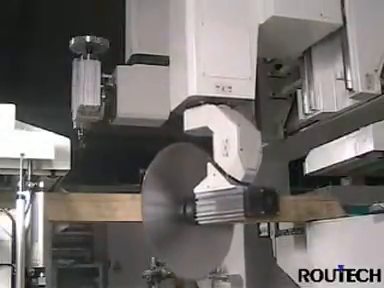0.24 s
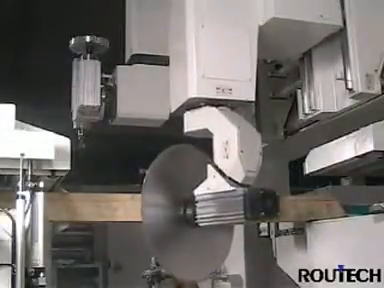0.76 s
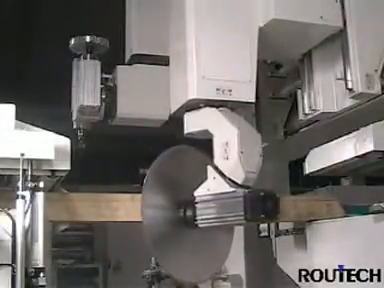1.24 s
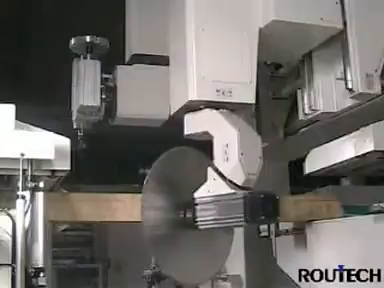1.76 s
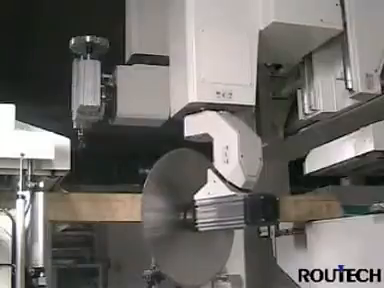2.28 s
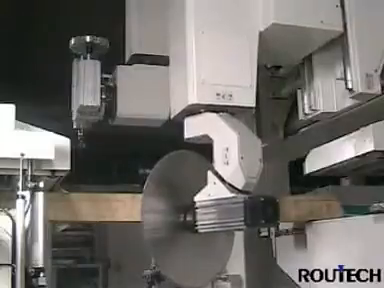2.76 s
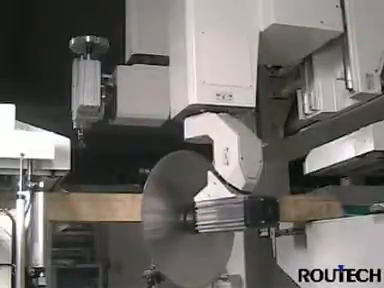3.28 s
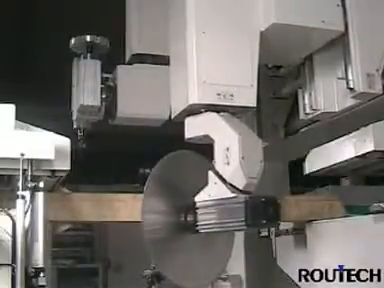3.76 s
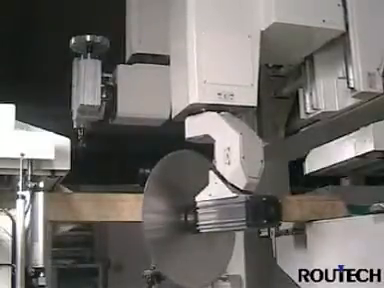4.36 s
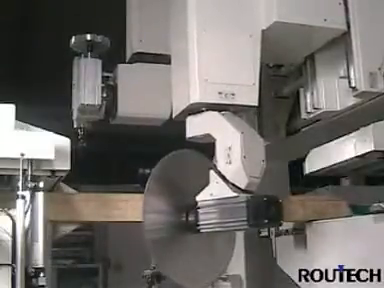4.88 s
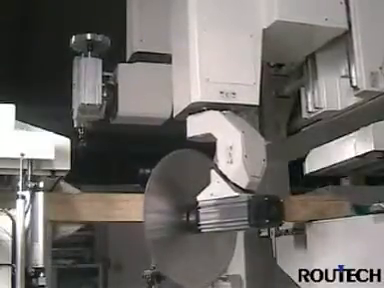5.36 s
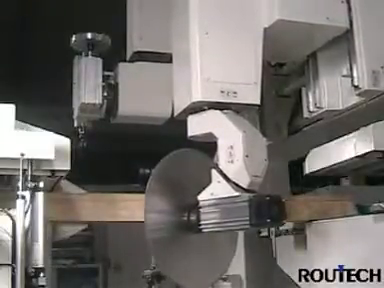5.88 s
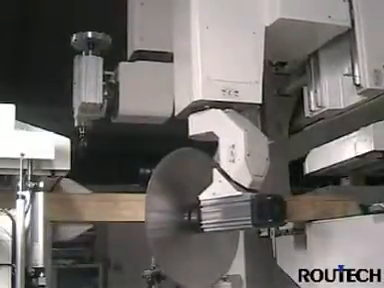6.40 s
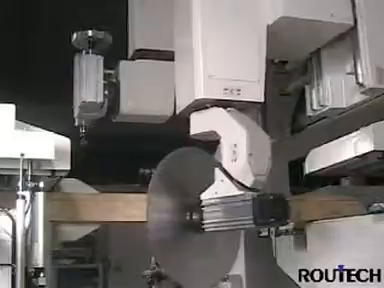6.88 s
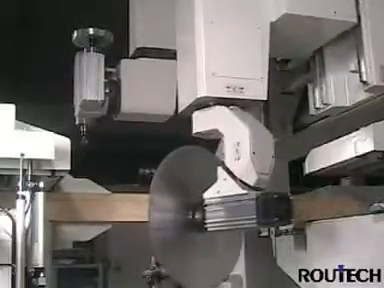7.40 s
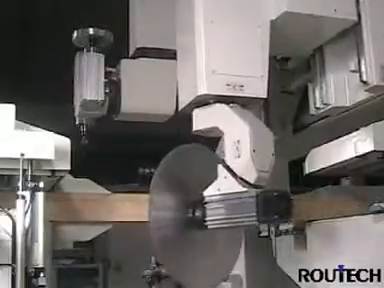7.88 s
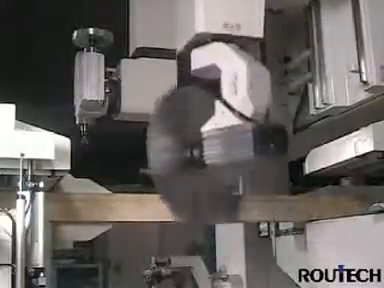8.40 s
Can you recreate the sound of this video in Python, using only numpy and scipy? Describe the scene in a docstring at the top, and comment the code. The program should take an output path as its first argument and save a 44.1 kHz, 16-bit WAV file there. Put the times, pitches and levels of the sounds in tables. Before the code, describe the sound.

In a workshop, a big spinning saw blade whooshes steadily while its teeth buzz and whine in a wooden beam. Midway it bites harder: the wood growls briefly, the ringing grows stronger and splinters spit off in little bursts. For the last couple of seconds the cutting is over and only the rushing blade remains, with a soft motor hum and low room rumble underneath.

```python
"""A broad whoosh with a buzzing whine: a large 48-tooth saw blade is cutting through a wooden beam.
The spinning teeth whip up the air and whine as they strike the wood. Being uneven, they repeat a buzzing
pattern on every turn. Near 4 s the cut gets heavier, the beam growls and splinters fly. Near 6.4 s the
blade comes out and whooshes on in free air. Motors hum and the workshop rumbles underneath."""
import sys
import numpy as np
from scipy import signal
from scipy.fft import rfft, irfft, next_fast_len
from scipy.io import wavfile
from scipy.ndimage import map_coordinates

SR = 44100
rng = np.random.default_rng(int(sys.argv[2]) if len(sys.argv) > 2 else 0)


def persist_wave(psi):
    """Save psi, clipped to +-1, as 16-bit WAV."""
    counts = np.round(np.clip(psi, -1, 1) * 32767).astype(np.int16)
    wavfile.write(sys.argv[1], SR, np.atleast_2d(counts).T)


N = 381465
TIME = np.arange(N) / SR
TEETH = 48
HEAVY_FROM_S, HEAVY_RISE_S = 3.82, .12   # the light cut turns heavy
EXIT_S, EXIT_FADE_S = 6.38, .07   # the blade leaves the beam

# Blade speed, sagging under load: time_s, turns_per_s
BLADE_SPEED = [(0, 24.885), (1.5, 24.915), (3.4, 24.921), (4.05, 24.864), (5.7, 24.866), (6.6, 24.9)]
# Air whipped by the teeth: time_s, level_db
WHOOSH_LEVEL = [(0, -20.5), (3.5, -19.5), (4.1, -23.5), (4.6, -21), (5.0, -21.5), (5.6, -21), (6.0, -20),
                (6.5, -19), (7.5, -18.5), (8, -19), (8.65, -18.6)]
# The whoosh's mix of low and high sound: pitch_hz, relative_db
WHOOSH_COLOUR = [(290, -54.5), (500, -30), (559, -30.5), (610, -29.5), (633, -24), (699, -25), (811, -16.5),
                 (1180, -9.5), (1380, -2.5), (1600, -3.5), (1860, -8.5), (2840, -21), (3920, -24),
                 (6050, -35), (9700, -40), (12600, -70.5), (21300, -120)]
# Teeth scraping the wood: time_s, level_db, treble_boost_db
BUZZ_LEVEL = [(0, -33, 5), (.5, -33, 2.5), (1, -31, 1), (1.5, -32.5, 1.5), (2.5, -33.5, 2), (2.9, -33.5, 5),
              (3.65, -32.5, -3), (3.8, -29, 0), (4, -26.5, -1), (4.2, -30, 3.5), (5.1, -29.5, 3.5),
              (5.7, -31.5, 3.5), (5.9, -31, -1.5), (6.15, -32.5, 0), (6.38, -34, -7)]
# How blade and beam colour that scraping: pitch_hz, relative_db
BUZZ_COLOUR = [(1200, -30), (2000, -9), (2600, -4), (3500, 1.5), (4100, -6.5), (4800, -3), (5600, -10.5),
               (7200, -12), (7800, -18), (9900, -20.5)]
# Whine at 1 to 8 times the rate of tooth strikes: light_cut_db, heavy_cut_db
WHINE_LEVELS = [(-46.5, -36.5), (-32.5, -43.5), (-47.5, -54), (-50.5, -48), (-59, -63), (-60, -61),
                (-63, -63), (-58, -67)]
# Tones of the shaking beam and frame: cycles_per_turn
THRUM_MULTIPLES = (3, 4, 5, 6, 10, 12, 14, 18, 20, 22, 24)
# Strength of each of those tones: light_cut_db, heavy_cut_db
THRUM_LEVELS = [(-80, -67), (-73, -70), (-68, -67), (-59.5, -66), (-61, -57), (-67, -60.5), (-76, -77),
                (-57.5, -60), (-68.5, -70), (-55, -61), (-52, -52.5)]
# High ringing tones at multiples of the turning rate, left out of the scraping buzz: cycles_per_turn
RING_MULTIPLES = (90, 91, 135, 139, 146, 147, 148, 150, 164, 170, 207)
# Strength of each of those tones: light_cut_db, heavy_cut_peak_db
RING_LEVELS = [(-51, -39.5), (-54, -45), (-57.5, -49), (-55, -48), (-65, -45.5), (-63.5, -52), (-60, -55.5),
               (-60, -56), (-59.5, -47.5), (-62, -44), (-55, -56)]
# Tones swell where the blade's place in the beam makes them ring:
# peak_time_s, length_s, cycles_per_turn, peak_db
TONE_SWELLS = [(.15, 1.0, 144, -37), (.45, 1.1, 24, -43.5), (.5, .8, 90, -44), (.75, .7, 150, -43),
               (1.7, .6, 150, -47), (.6, .4, 48, -40), (.75, .6, 336, -53), (.9, 1.4, 288, -50),
               (1.5, 1.2, 207, -52), (1.7, 1.0, 139, -49), (2.0, 1.8, 96, -32), (2.4, .4, 48, -41),
               (3.0, 1.7, 144, -38.5), (3.4, 1.1, 48, -39), (3.45, .7, 135, -42), (3.4, .8, 139, -48),
               (3.75, .7, 192, -44), (4.0, .4, 3, -65), (4.0, .4, 12, -54), (4.2, .5, 139, -46),
               (4.7, .8, 192, -44), (4.85, .9, 144, -42), (5.0, .9, 135, -43), (6.0, .5, 96, -41),
               (6.0, .4, 144, -43), (6.0, .4, 192, -46), (6.25, .4, 139, -43), (6.25, .35, 207, -50),
               (6.5, .45, 48, -38)]
# Bursts of splinters: peak_time_s, peak_db, pitch_hz, length_s
SPLINTER_BURSTS = [(3.968, -34, 3900, .08), (4.092, -29, 4000, 0.034), (4.363, -40, 7800, .04),
                   (4.57, -40, 7800, .03), (4.798, -39, 7500, .04), (4.97, -43, 7800, .03),
                   (5.29, -34, 4400, 0.11), (5.58, -42, 7800, .03), (6.05, -44, 7800, .04)]
# Strength of each tone in the beam's growl: time_s, level_db
GROWL_LEVEL = [(3.7, -80), (3.88, -60), (4.15, -59), (4.35, -75), (4.6, -90)]
# The motor that spins the blade: time_s, level_db
SPINDLE_LEVEL = [(0, -62), (.6, -55), (1.2, -50), (1.5, -46), (2.4, -46), (3, -50), (3.3, -47), (3.9, -54),
                 (4.4, -47), (5.1, -56), (5.5, -49), (6, -58), (6.3, -48), (7.2, -48), (7.6, -57),
                 (8.65, -60)]
# The feed motor, speeding up as it pulls the saw away: time_s, pitch_hz, level_db
FEED_MOTOR = [(7.1, 80, -85), (7.18, 85, -62), (7.4, 92, -65), (8.1, 98, -68), (8.4, 103, -63),
              (8.65, 125, -61)]
# Steady motor hum: pitch_hz, level_db
HUM_TONES = [(199.4, -60), (299.6, -61)]
# The workshop's rumble: pitch_hz, relative_db
RUMBLE_COLOUR = [(15, -63.5), (25, -32.5), (98, -20.5), (167, -17), (193, -13.5), (254, -13), (290, -12.5),
                 (607, -8), (800, -9.5), (1040, -42), (1760, -120)]


def whoosh():
    """Air swirls off the gaps between the teeth: noise whose low and high parts gust separately."""
    level_db, = in_time(WHOOSH_LEVEL)
    air = coloured(rng.standard_normal(N), WHOOSH_COLOUR)
    low = signal.sosfiltfilt(signal.butter(2, 1500, fs=SR, output="sos"), air)
    low_gust, high_gust = [from_db(.8 * drift(8) + .5 * drift(16)) for _ in range(2)]
    return from_db(level_db) * (low_gust * low + high_gust * (air - low))


def rim_scrape(turns, renew_turns=8.0, uneven_db=2.2, steps=1024):
    """Each spot on the rim scrapes alike on every turn; the pattern changes as the cut moves on."""
    spectra = rfft(rng.standard_normal((40, steps)))   # 40 patterns, each one turn long
    # The blade rings more readily at some pitches than at others.
    spectra *= from_db(uneven_db * rng.standard_normal(steps // 2 + 1))
    # Leave gaps for the tooth whine and the high ringing tones.
    spectra[:, ::TEETH] = 0
    spectra[:, list(RING_MULTIPLES)] = 0
    patterns = irfft(spectra, steps)
    patterns = np.concatenate([patterns, patterns[:, :4]], axis=1)   # close the circle
    age = turns / renew_turns
    row, blend = age.astype(int), age % 1 * np.pi / 2
    rim_spot = turns % 1 * steps
    older = map_coordinates(patterns, [row, rim_spot], order=1)
    newer = map_coordinates(patterns, [row + 1, rim_spot], order=1)
    return rms_one(np.cos(blend) * older + np.sin(blend) * newer)


def cutting_buzz(turns):
    """The teeth scrape out a repeating buzz while flying chips add a hiss."""
    level_db, treble_db = in_time(BUZZ_LEVEL)
    scrape = rim_scrape(turns)
    chip_gain = from_db(by_load(-.5, 2.5))
    chips = chip_gain * rng.standard_normal(N)
    mix = (scrape + chips) / np.sqrt(1 + chip_gain ** 2)
    # The blade runs slightly off true, so part of the rim bites harder.
    angle = 2 * np.pi * turns
    wobble_db = 1.4 * (np.sin(angle) + .54 * np.sin(2 * angle + 1) + .5 * np.sin(4 * angle + 2))
    buzz = coloured(from_db(wobble_db) * mix, BUZZ_COLOUR)
    # The treble flutters with the grain of the wood.
    treble = signal.sosfilt(signal.butter(2, 5500, "high", fs=SR, output="sos"), buzz)
    flutter_db = .9 * drift(16) + 1.1 * drift(35)
    buzz += (from_db(treble_db + flutter_db) - 1) * treble
    return from_db(level_db + .6 * drift(20)) * buzz * in_wood()


def tooth_whine(turns):
    """About 1200 teeth hit the wood each second, making a high note with overtones."""
    return sum(cut_tone(turns, k * TEETH, db, waver_db=.8) for k, db in enumerate(WHINE_LEVELS, 1))


def high_ringing(turns):
    """High tones ring at multiples of the turning rate while the blade is in the wood."""
    # In the heavy cut they are strongest midway and up to 8 dB weaker towards the ends.
    gain = from_db(by_load(0, -8) * (1 - bump(peak_s=5.15, length_s=2.0) ** 2))
    return sum(cut_tone(turns, k, db, waver_db=2.0, gain=gain)
               for k, db in zip(RING_MULTIPLES, RING_LEVELS))


def splinters(width_octaves=.56):
    """Wood splinters off in short bursts of high hiss."""
    out, noise = np.zeros(N), rng.standard_normal(N)
    for peak_s, peak_db, pitch_hz, length_s in SPLINTER_BURSTS:
        edges_hz = pitch_hz * 2 ** (np.array([-.5, .5]) * width_octaves)
        hiss = signal.sosfilt(signal.butter(2, edges_hz, "band", fs=SR, output="sos"), noise)
        out += from_db(peak_db) * rms_one(hiss) * bump(peak_s, length_s)
    return out


def frame_thrum(turns):
    """The blade shakes the beam and frame, making low tones in step with its turning."""
    return sum(cut_tone(turns, k, db, waver_db=2.0) for k, db in zip(THRUM_MULTIPLES, THRUM_LEVELS))


def beam_growl(turns):
    """The beam growls with eight close, low tones as the load on the blade jumps."""
    level_db, = in_time(GROWL_LEVEL)
    return sum(tone(k * turns, level_db, waver_db=2.5) for k in range(9, 17))


def motors(turns):
    """The blade's motor sings over a steady hum; near the end the feed motor rises in pitch."""
    spindle_db, = in_time(SPINDLE_LEVEL)
    spindle = tone(26 * turns, spindle_db, waver_db=.4)
    hum = sum(tone(hz * TIME, db, waver_db=1.2) for hz, db in HUM_TONES)
    feed_hz, feed_db = in_time(FEED_MOTOR)
    feed = tone(np.cumsum(feed_hz) / SR, feed_db, waver_db=1.0)
    return spindle + hum + feed


def workshop_rumble(level_db=-45.5):
    """Soft, dull noise fills the workshop."""
    return from_db(level_db) * coloured(rng.standard_normal(N), RUMBLE_COLOUR)


def cut_tone(turns, multiple, levels_db, waver_db, gain=1):
    """A tone at a multiple of the turning rate: it follows the load, with any swells added on top."""
    strength = from_db(by_load(*levels_db)) * in_wood() * gain
    for peak_s, length_s, swell_multiple, peak_db in TONE_SWELLS:
        if swell_multiple == multiple:
            strength = np.hypot(strength, from_db(peak_db) * bump(peak_s, length_s))
    return strength * tone(multiple * turns, 0, waver_db)


def tone(cycles, level_db, waver_db):
    """A pure tone whose strength and timing wander a little."""
    phase = 2 * np.pi * (cycles + rng.random()) + .1 * drift(6)
    return np.sqrt(2) * from_db(level_db + waver_db * drift(4)) * np.sin(phase)


def by_load(light, heavy):
    """Slide from one value to the other as the cut turns heavy."""
    return np.interp(TIME, [HEAVY_FROM_S, HEAVY_FROM_S + HEAVY_RISE_S], [light, heavy])


def in_wood():
    """1 while the teeth are in the beam, falling to 0 as they leave it."""
    return np.interp(TIME, [EXIT_S, EXIT_S + EXIT_FADE_S], [1, 0])


def bump(peak_s, length_s):
    """A bell-shaped swell of height 1."""
    return np.exp(-((TIME - peak_s) / (length_s / 2)) ** 2)


def drift(points_per_s):
    """A wandering value, typically about 1 in size: random points joined by straight lines."""
    position = TIME * points_per_s
    points = rng.standard_normal(int(position[-1]) + 2)
    return np.interp(position, np.arange(len(points)), points) * np.sqrt(3 / 2)


def coloured(sound, colour):
    """Turn each pitch up or down as a colour table says, then set the average strength to 1."""
    hz, db = np.transpose(colour)
    size = next_fast_len(N)
    log_hz = np.log(np.maximum(np.arange(size // 2 + 1) * SR / size, 1))
    gain = from_db(np.interp(log_hz, np.log(hz), db, left=-90))
    return rms_one(irfft(rfft(sound, size) * gain, size)[:N])


def in_time(rows):
    """Turn each column after time_s into a curve with one value per sample."""
    time_s, *columns = np.transpose(rows)
    return [np.interp(TIME, time_s, column) for column in columns]


def rms_one(sound):
    """Scale a sound to an average strength (rms) of 1."""
    return sound / np.sqrt(np.mean(sound ** 2) + 1e-20)


def from_db(db):
    """Turn decibels into a number to multiply by."""
    return 10 ** (np.asarray(db) / 20)


def scene():
    """The saw, the wood, the motors and the workshop together in one channel."""
    turns = np.cumsum(in_time(BLADE_SPEED)[0]) / SR   # blade turns so far
    noises = whoosh() + cutting_buzz(turns) + splinters()
    tones = tooth_whine(turns) + frame_thrum(turns) + high_ringing(turns) + beam_growl(turns)
    return (noises + tones + motors(turns) + workshop_rumble())[None]


def record(dry, cutoff_hz=9950):
    """Cut away the highest treble steeply."""
    return signal.sosfilt(signal.ellip(14, .3, 75, cutoff_hz, fs=SR, output="sos"), dry)


dry = scene()
out = record(dry)
persist_wave(out)
```